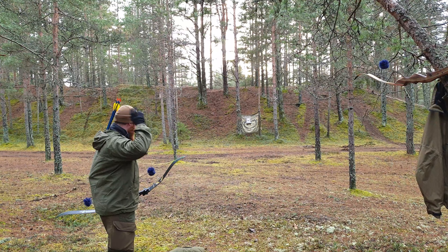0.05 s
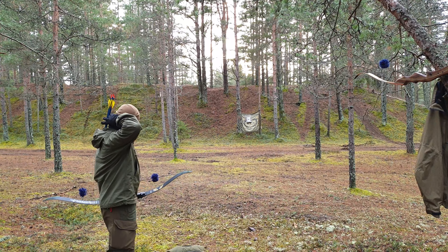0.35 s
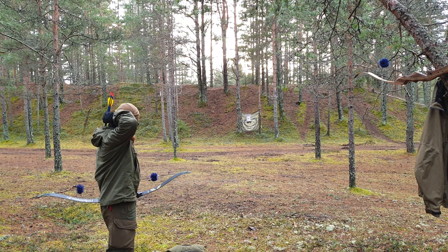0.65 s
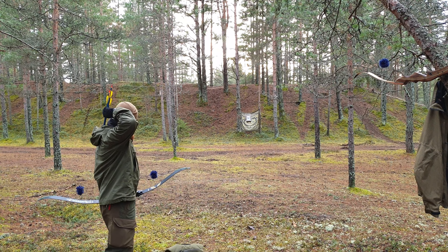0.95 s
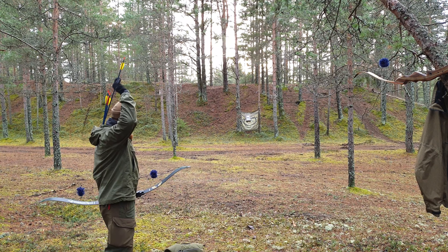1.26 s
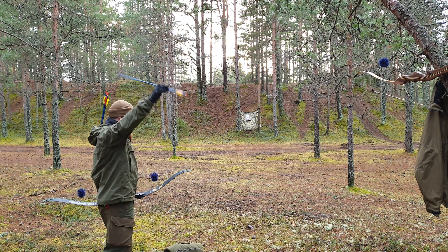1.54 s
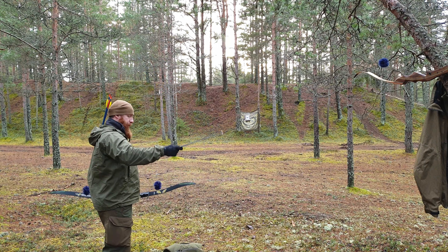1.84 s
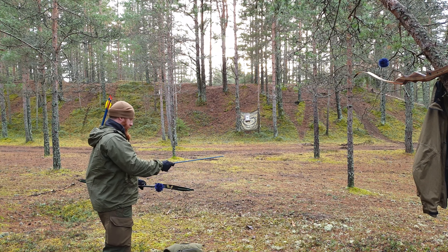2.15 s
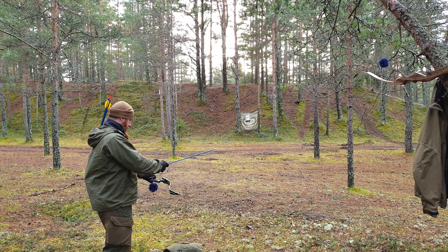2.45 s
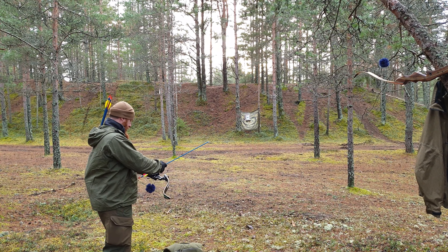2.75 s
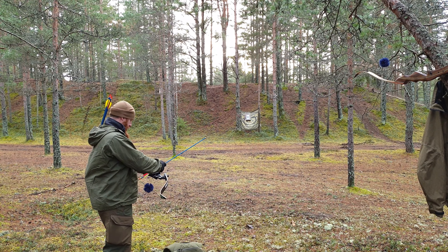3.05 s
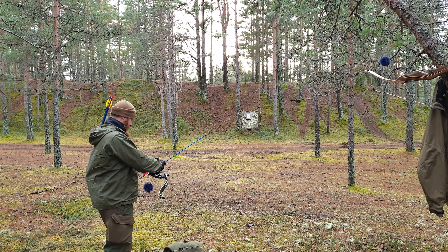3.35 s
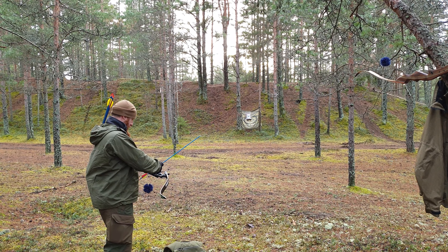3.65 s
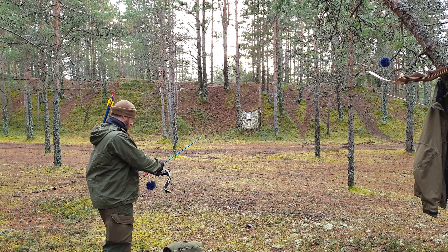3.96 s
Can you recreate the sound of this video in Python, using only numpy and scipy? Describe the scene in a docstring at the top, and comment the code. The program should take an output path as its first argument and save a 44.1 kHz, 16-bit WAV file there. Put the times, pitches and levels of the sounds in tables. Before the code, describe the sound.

An arrow snaps onto a bowstring close by at about 3.9 seconds, a bright click with a brief ring and faint forest echo. Before it, during the first 1.5 seconds, a jacket rustles very quietly, feathers brush the quiver and shafts rub, ticking around 0.6 and 1.4 seconds. Low wind buffets the microphone throughout, gustier after 2 seconds, as the soft rush of distant trees grows.

```python
"""An arrow's nock snaps onto the bowstring near the microphone: the bow rings, the pines answer.
Before that, much quieter, the archer reaches over his shoulder and slides the arrow from the quiver:
his jacket rustles, shafts rub and tick together, feathers brush the rim.
Stereo microphone in a pine clearing, buffeted by light wind, with the soft rush of the forest far off."""
import sys
import numpy as np
from scipy import signal
from scipy.fft import rfft, irfft
from scipy.io import wavfile
from scipy.ndimage import uniform_filter1d, map_coordinates

SR = 44100
rng = np.random.default_rng(int(sys.argv[2]) if len(sys.argv) > 2 else 0)


def output_pcm(signal):
    """Save a mono or channel-first signal as 16-bit PCM at the path in sys.argv[1].

    Samples are clipped to [-1, 1] before scaling.
    """
    pcm = np.clip(np.atleast_2d(signal).T, -1, 1) * 32767
    wavfile.write(sys.argv[1], SR, np.round(pcm).astype(np.int16))


N = 176400
TIME = np.arange(N) / SR
BIN_HZ = np.arange(N // 2 + 1) * SR / N


def from_db(db):
    """Decibels to gain."""
    return 10 ** (np.asarray(db) / 20)


def unit_rms(x):
    """Scale to rms 1."""
    return x / np.sqrt(np.mean(x ** 2) + 1e-20)


def level(points):
    """Gain over time from points of t/s, level/dB."""
    return from_db(np.interp(TIME, *np.transpose(points)))


def per_bin(points):
    """Spread points of f/Hz, value over the spectrum, on a log-frequency axis."""
    hz, values = np.transpose(points)
    return np.interp(np.log(BIN_HZ + 1), np.log(hz), values)


def colour(x, spectrum):
    """Shape a sound by relative levels, falling away under the lowest point; rms 1."""
    skirt = np.minimum(BIN_HZ / spectrum[0][0], 1) ** 2
    return unit_rms(irfft(rfft(x) * from_db(per_bin(spectrum)) * skirt, N))


def noise(spectrum):
    """Coloured noise, unrelated in the two channels."""
    return colour(rng.standard_normal((2, N)), spectrum)


def grains(per_s, spread_db=3.0):
    """Random tiny slips of uneven size, in two channels."""
    sizes = from_db(spread_db * np.minimum(rng.exponential(1, (2, N)), 5))
    slips = rng.random((2, N)) < per_s / SR
    return unit_rms(slips * sizes * rng.choice([-1, 1], (2, N)))


def band(x, hz, kind):
    """Second-order Butterworth filter."""
    return signal.sosfilt(signal.butter(2, hz, kind, fs=SR, output="sos"), x)


def resonance(x, hz, width_hz):
    """One resonance with unit gain at its peak."""
    radius = np.exp(-np.pi * width_hz / SR)
    feedback = [1, -2 * radius * np.cos(2 * np.pi * hz / SR), radius ** 2]
    return signal.lfilter(np.array([1, 0, -1]) * (1 - radius ** 2) / 2, feedback, x)


def swell(t, half_s):
    """A bell-shaped rise and fall around time t."""
    return np.exp(-((TIME - t) / half_s) ** 2)


def struck(t, t60, build_s):
    """An envelope that builds quickly from time t and dies away."""
    age = np.maximum(TIME - t, 0)
    return (1 - np.exp(-age / build_s)) * from_db(-60 * age / t60)


def flicker(per_s):
    """Random wavering with a spread of about 1."""
    return np.interp(TIME * per_s, np.arange(2000), rng.standard_normal(2000))


def wander(x, depth):
    """Let the pitch stray a little, as a point of contact moves."""
    position = np.arange(N) + np.cumsum(depth * flicker(per_s=25))
    return np.array([map_coordinates(channel, [position], order=3, mode="mirror") for channel in x])


# Far trees, heard from the clearing: t/s, level/dB
FOREST_LEVEL = [(0.07, -67), (0.6, -67), (0.9, -68), (1.9, -66), (2.3, -62.5), (2.7, -58), (3.3, -58),
                (4.0, -56.5)]
# Spectrum of their rush: f/Hz, level/dB
FOREST_COLOUR = [(100, -4.5), (280, -1.5), (500, -1.5), (900, -2.5), (1150, -7), (1450, -17.5),
                 (1850, -23.5), (2400, -36), (4000, -41.5), (8000, -39)]
# The part that arrives from all around: f/Hz, left-right correlation
FOREST_LIKENESS = [(100, 0.057), (290, 1), (640, 0.33), (1350, -0.28), (3000, 0.13)]

def forest(left_db=-7, lag_s=0.00047):
    """Distant trees rush all around; a share from the left reaches the right channel later."""
    mid, side, left = rfft(rng.standard_normal((3, N)))
    alike = np.clip(per_bin(FOREST_LIKENESS), -1, 1)
    around = np.sqrt(1 + alike) * mid + np.sqrt(1 - alike) * side * [[1], [-1]]
    delay = np.exp(-2j * np.pi * BIN_HZ * lag_s * [[0], [1]])
    from_left = np.sqrt(2) * from_db(left_db) * left * delay
    return level(FOREST_LEVEL) * colour(irfft(around + from_left, N), FOREST_COLOUR)


# Noise floor of the microphone: t/s, level/dB
HISS_LEVEL = [(0.07, -86.5), (1.9, -86), (2.3, -82.5), (2.75, -78.5), (4.0, -78)]
# Its spectrum: f/Hz, level/dB
HISS_COLOUR = [(1500, -5), (2800, -1.5), (5000, -5), (8000, -20), (9500, -11), (11000, -2), (15500, -1)]

def microphone_hiss():
    """The microphone's own faint noise, rising in the second half."""
    return level(HISS_LEVEL) * noise(HISS_COLOUR)


# Breeze right on the microphone: t/s, level/dB
BREEZE = [(0.07, -51), (0.8, -54), (1.45, -58.5), (1.9, -54), (2.6, -44.5), (3.15, -50.5), (3.5, -46.5),
          (4.0, -42)]
# Gusts on top of it: t/s, half-length/s, left level/dB, right level/dB
GUSTS = [(0.157, 0.052, -42.5, -68), (0.39, 0.038, -40, -53), (0.624, 0.095, -51, -51.5),
         (1.022, 0.032, -67, -39.5), (1.103, 0.09, -65, -46.5), (1.722, 0.11, -63, -44),
         (2.141, 0.027, -37, -38), (2.192, 0.016, -62, -30), (2.417, 0.027, -48, -31),
         (2.55, 0.083, -55, -49), (2.857, 0.049, -61, -31.5), (3.0, 0.07, -45.5, -47),
         (3.355, 0.14, -68, -38), (3.469, 0.039, -48, -33), (3.599, 0.076, -42.5, -30),
         (3.773, 0.096, -40.5, -45.5), (3.92, 0.017, -53, -35), (3.946, 0.016, -49, -19.5)]
# Rumble of the eddies: f/Hz, level/dB
WIND_COLOUR = [(28, -15.5), (38, -1), (50, -1), (65, 6), (95, -4), (150, -13), (200, -24), (300, -33.5),
               (600, -49)]

def wind(smooth_s=0.033):
    """Eddies thump on each microphone port separately, swelling with every gust."""
    eddies = noise(WIND_COLOUR)
    eddy_power = uniform_filter1d(np.abs(signal.hilbert(eddies)) ** 2 / 2, int(smooth_s * SR))
    even_eddies = eddies / np.sqrt(eddy_power)
    gust_power = sum((from_db([[left], [right]]) * swell(t, half)) ** 2
                     for t, half, left, right in GUSTS)
    buffeting = even_eddies * np.sqrt(level(BREEZE) ** 2 + gust_power)
    return band(band(buffeting, hz=604, kind="low"), hz=29, kind="high")


# The archer's jacket sleeve, near the microphone: t/s, level/dB
SLEEVE_LEVEL = [(0.07, -81), (0.22, -75.5), (0.38, -81.5), (0.55, -77.5), (0.64, -79.5), (0.74, -107),
                (0.93, -97), (1.15, -90), (1.34, -81), (1.46, -100), (2.0, -105)]
# Spectrum of the cloth: f/Hz, level/dB
SLEEVE_COLOUR = [(800, -0.5), (1700, 4.5), (3000, -8.5), (5000, -6), (7000, -4), (9000, -1), (11000, -11.5),
                 (15500, -6.5)]

def sleeve():
    """Cloth slides on cloth as the arm goes up: dense fine grains."""
    return level(SLEEVE_LEVEL) * colour(grains(per_s=8100), SLEEVE_COLOUR)


# Shafts rubbing behind his shoulder: t/s, half-length/s, level/dB, tilt/(dB per octave)
RUBS = [(0.088, 0.016, -79.5, 6), (0.139, 0.049, -74.5, 0), (0.488, 0.043, -82, -11),
        (0.563, 0.029, -79.5, -7), (0.812, 0.042, -77, -4), (0.886, 0.018, -77, -6), (0.927, 0.046, -72, 5),
        (1.006, 0.036, -77.5, -3), (1.09, 0.059, -80.5, 14), (1.238, 0.17, -83.5, 7),
        (1.363, 0.016, -73, -2), (1.407, 0.018, -84.5, -7)]
# Resonances of shaft and quiver: f/Hz, width of one filter pass/Hz, relative level/dB
QUIVER_MODES = [(3850, 260, -7), (4330, 300, 0), (4740, 260, -3), (6300, 280, -6), (7000, 420, -3),
                (7400, 350, -2), (8900, 1000, -9)]

def shaft_rubs(flicker_db=3.5, direct_db=-21):
    """Each stroke sends friction grains through the resonances of shaft and quiver, which waver."""
    friction = band(grains(per_s=2200, spread_db=1.5), hz=3260, kind="high")
    modes = []
    for k, (hz, width, db) in enumerate(QUIVER_MODES):
        gain = (-1) ** k * from_db(db + flicker_db * flicker(per_s=45))
        ringing = resonance(resonance(friction, hz, width), hz, width)
        modes.append(gain * wander(ringing, depth=0.025))
    octaves = np.log2(np.array(QUIVER_MODES)[:, 0])
    out = 0
    for t, half, db, tilt in RUBS:
        weights = from_db(tilt * (octaves - octaves.mean()))
        body = np.tensordot(weights, modes, axes=1)
        out += from_db(db) * swell(t, half) * unit_rms(body + from_db(direct_db) * friction)
    return out


# Fingers stirring the bundle of arrows: t/s, half-length/s, level/dB
RATTLES = [(0.547, 0.022, -76), (0.606, 0.024, -68)]
# Spectrum of the bundle: f/Hz, level/dB
RATTLE_COLOUR = [(2500, -17.5), (3200, -6), (4100, -6), (4800, 4), (5500, -10), (6200, -1), (7500, -11),
                 (10000, -24), (15000, -28)]

def bundle_rattle():
    """Many small contacts among the shafts run together."""
    envelope = sum(from_db(db) * swell(t, half) for t, half, db in RATTLES)
    return envelope * colour(grains(per_s=1200), RATTLE_COLOUR)


# The arrow passing the rim of the quiver: t/s, half-length/s, level/dB
SWISHES = [(0.94, .04, -78.5), (1.2, 0.13, -84), (1.325, .035, -78), (1.363, .01, -76)]
# Spectrum of the swish: f/Hz, level/dB
SWISH_COLOUR = [(6000, -18), (9000, -3), (12000, -3), (15000, -7.5)]

def feather_swishes():
    """Feathers and shaft slide fast over the rim with a fine, bright hiss."""
    envelope = sum(from_db(db) * swell(t, half) for t, half, db in SWISHES)
    return envelope * colour(grains(per_s=5800), SWISH_COLOUR)


# Shafts knocking together, near the microphone: t/s, level/dB, t60/s, centre f/Hz
KNOCKS = [(0.531, -63, 0.025, 4960), (0.5882, -60.5, .03, 5260), (0.6155, -61.5, 0.02, 7940),
          (0.624, -59.5, 0.016, 6060), (0.638, -63, 0.0097, 6300), (0.6853, -63, 0.016, 5570),
          (1.365, -61, 0.053, 6100), (1.370, -59, 0.021, 6960), (1.501, -84, .05, 5000),
          (1.996, -79.5, 0.022, 5430), (3.652, -73, 0.016, 11100)]

def shaft_knocks(band_ratio=1.4, trees_db=-22):
    """Shafts touch in short dry ticks, each with a faint answer from the trees."""
    white = rng.standard_normal((2, N))
    out = 0
    for t, db, t60, hz in KNOCKS:
        tick = unit_rms(band(white, [hz / band_ratio, hz * band_ratio], "band"))
        direct = struck(t, t60, build_s=0.00026)
        trees = from_db(trees_db) * struck(t, t60=0.31, build_s=0.0071)
        out += from_db(db) * tick * (direct + trees)
    return out


# The nock's two jaws passing the string, in the foreground: t/s, left level/dB, right level/dB
NOCK_JAWS = [(3.8561, -37, -25.5), (3.8572, -26.5, -34)]
# Spectrum of their click: f/Hz, level/dB
CLICK_COLOUR = [(1000, -18), (2000, -10), (4200, -7.5), (6500, -12), (8100, -16), (8700, 2.5), (9700, 4.5),
                (11500, -8.5), (13300, 0.5), (15500, -2.5)]
# Modes of bow and arrow, to the microphone's right: f/Hz, right level/dB, t60/s
BOW_MODES = [(1257, -48, .07), (1719, -36.5, .1), (2174, -53, .22), (2217, -45.5, .19), (2295, -51, .14),
             (2763, -55, .18), (2860, -53, .12), (3460, -42.5, .11), (3578, -53, .09), (4058, -48, .08),
             (4250, -44, .06), (4574, -58, .15), (5728, -52, .08)]
# Scatter from the ground and the trunks farther off: level/dB, t60/s
SCATTER = [(-39, 0.05), (-48, 0.3)]
# Its spectrum: f/Hz, level/dB
SCATTER_COLOUR = [(700, -6), (1300, 4.5), (2200, 2.5), (3000, -0.5), (4100, 3), (5200, -5.5), (8000, -3.5),
                  (9000, -3.5), (11200, 3), (12200, -2), (13300, 1), (15500, 0.5)]

def nock_snap(bow_left_db=-6):
    """A bright double click sets bow and arrow ringing; ground and trunks scatter it back."""
    start = NOCK_JAWS[0][0]
    jaws = sum(from_db([[left], [right]]) * struck(t, t60=0.01, build_s=0.00025)
               for t, left, right in NOCK_JAWS)
    click = jaws * noise(CLICK_COLOUR)
    ring = 0
    for hz, db, t60 in BOW_MODES:
        phase, right_shift = rng.uniform(0, 2 * np.pi), rng.uniform(0, np.pi)
        tone = np.sin(2 * np.pi * hz * TIME + [[phase], [phase + right_shift]])
        ring += from_db(db) * struck(start, t60, build_s=0.0055) * tone
    tail = sum(from_db(db) * struck(start, t60, build_s=0.0019) for db, t60 in SCATTER)
    return click + ring * from_db([[bow_left_db], [0]]) + tail * noise(SCATTER_COLOUR)


def scene():
    """The clearing from the microphone's position: forest and wind behind, the archer in front."""
    background = forest() + microphone_hiss() + wind()
    handling = sleeve() + shaft_rubs() + bundle_rattle() + feather_swishes() + shaft_knocks()
    return background + handling + nock_snap()


OPEN_S, FADE_S, CUTOFF_HZ = 0.066, 0.004, 15900

def record(dry):
    """The microphone opens just after the start; the highest treble is cut steeply."""
    opened = np.clip((TIME - OPEN_S) / FADE_S, from_db(-43.5), 1)
    lowpass = signal.ellip(10, 0.1, 70, CUTOFF_HZ, fs=SR, output="sos")
    return signal.sosfiltfilt(lowpass, dry * opened)


dry = scene()
out = record(dry)
output_pcm(out)
```